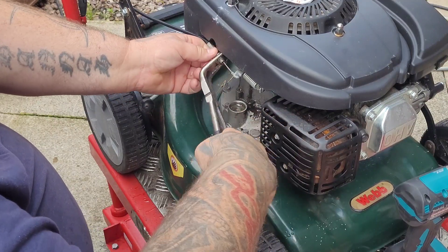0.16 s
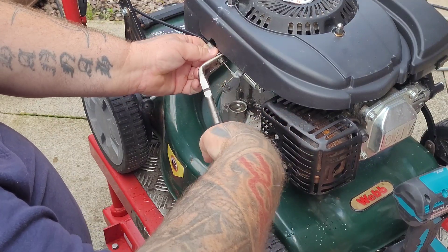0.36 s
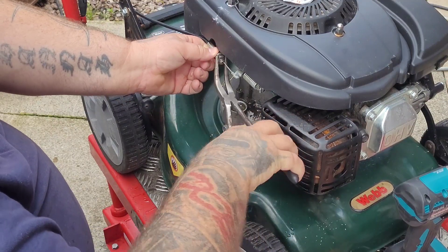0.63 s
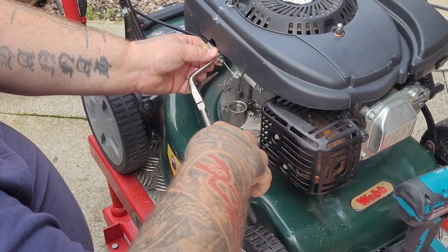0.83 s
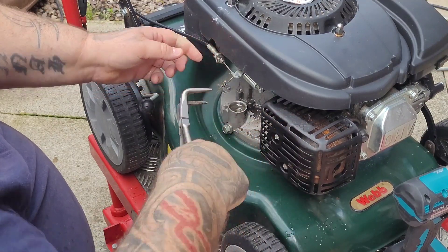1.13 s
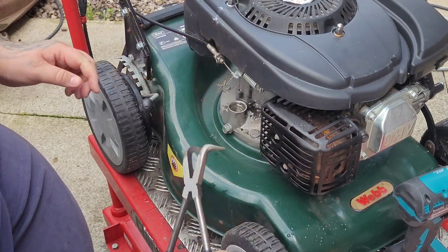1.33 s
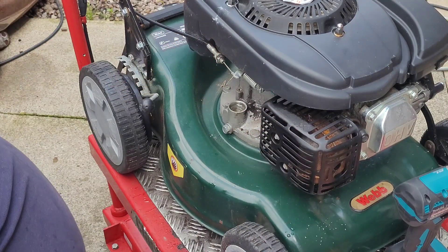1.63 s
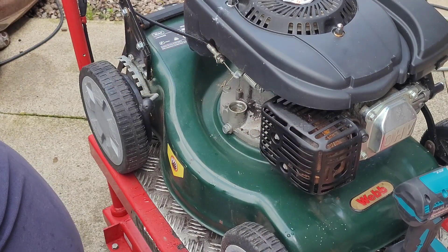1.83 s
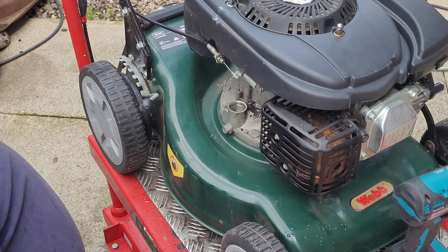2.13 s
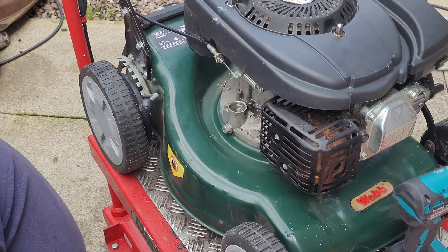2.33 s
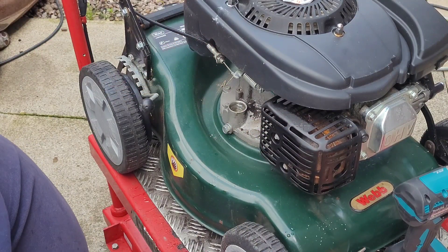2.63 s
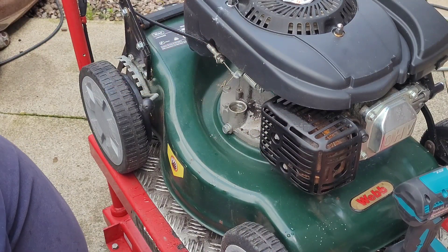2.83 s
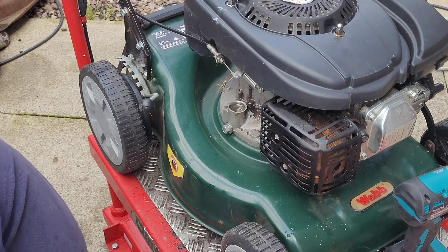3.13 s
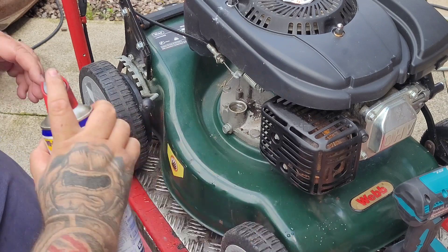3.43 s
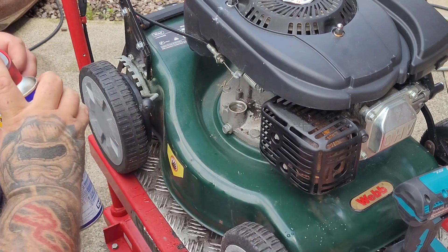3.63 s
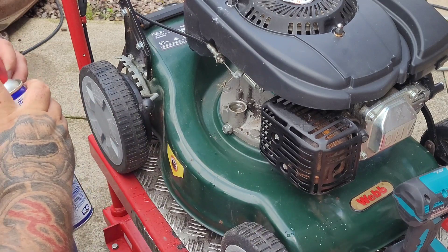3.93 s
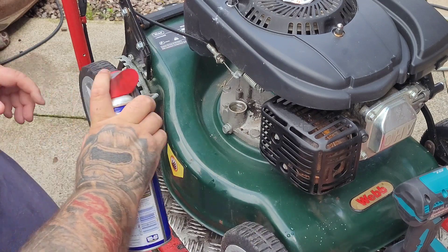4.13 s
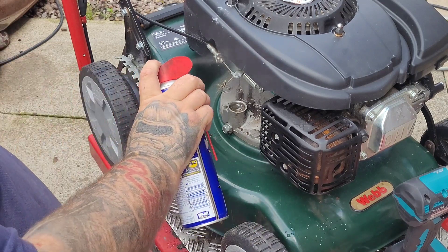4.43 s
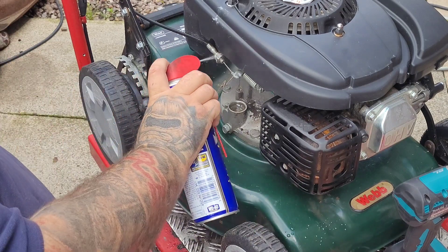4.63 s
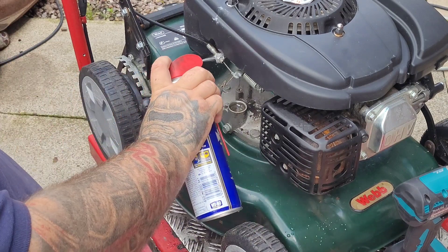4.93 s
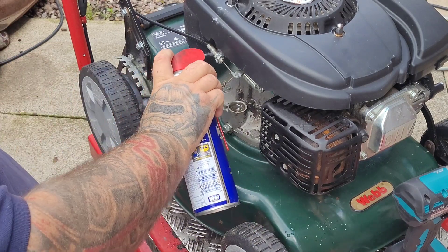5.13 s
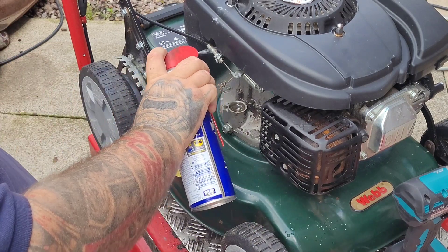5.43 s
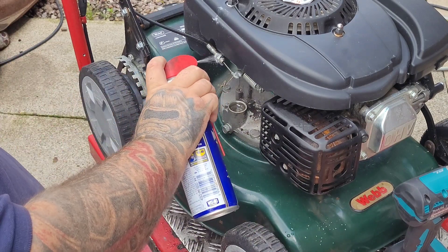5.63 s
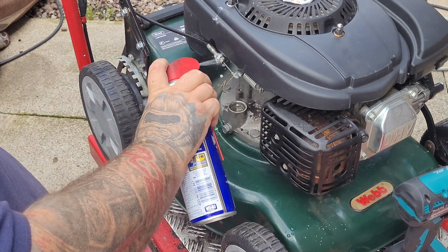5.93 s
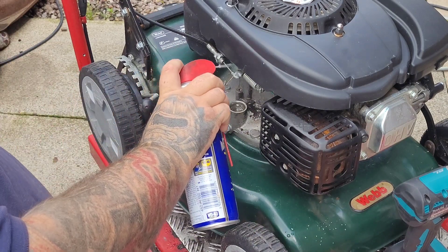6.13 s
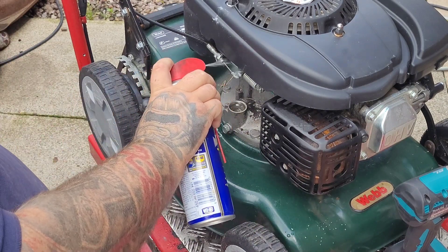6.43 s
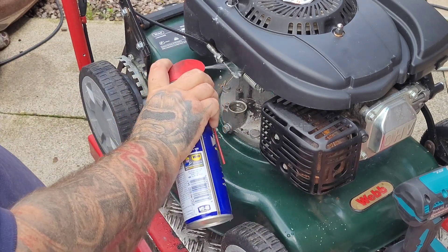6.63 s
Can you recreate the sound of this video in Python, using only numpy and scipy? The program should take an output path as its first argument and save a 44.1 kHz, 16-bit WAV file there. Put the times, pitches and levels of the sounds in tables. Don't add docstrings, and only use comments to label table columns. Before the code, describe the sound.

Close stereo pickup in a quiet paved yard with faint hum. Pliers touch and knock a metal mower deck, then drop onto a bench with loud, hollow booms and steel clangs, bouncing to a heavier final blow. Small plastic ticks and skin rubs follow as a can is handled. A brief burst of spray leads into a steady, sharp hiss that wets metal and continues to the end.

```python
import sys
import numpy as np
from scipy import signal
from scipy.fft import rfft, irfft, next_fast_len
from scipy.io import wavfile
from scipy.ndimage import uniform_filter1d, map_coordinates

SR = 44100
rng = np.random.default_rng(int(sys.argv[2]) if len(sys.argv) > 2 else 0)


def nominal_scale(level):
    x = np.asarray(level, float) / 20
    return 10 ** x


def waveform_to_disk(signal):
    frames = np.transpose(np.atleast_2d(signal))
    scaled = np.clip(frames, -1, 1) * 32767
    samples = np.round(scaled).astype(np.int16)
    wavfile.write(sys.argv[1], SR, samples)


N = 298557
LONG = next_fast_len(N, True)
TIME_S = np.arange(N) / SR
HZ = np.fft.rfftfreq(LONG, 1 / SR)
LOG_HZ = np.log(HZ + 1)
SIDES = np.array([[1.], [-1.]])
TOP_HZ = 15780

# opens [s], let go [s], rise [s], fall [s].
PRESSES = [
    (4.336, 4.529, 0.033, 0.05),
    (4.576, 7, 0.019, .05),
]
# time [s], flow as nozzle level [dB], aim at the metal [dB], reach into the hollow [dB].
JET_HAND = [(4.35, -48, 8, 3), (4.4, -46, 7, 2), (4.52, -43.5, 6, -1), (4.6, -49.5, 2, 1.5),
            (4.77, -47, -3.5, 1.5), (4.91, -49.5, -4.5, 3), (5.04, -49, 1, -2), (5.17, -44.5, -1, 2),
            (5.28, -47.5, 0, -0.5), (5.42, -46.5, 1, -1), (5.54, -45.5, -2.5, -2), (5.78, -49, 2.5, 3),
            (6.04, -44, 1, 4), (6.28, -44.5, -3, 1.5), (6.35, -45, 0.5, -1.5), (6.6, -47, -5, -0.5),
            (6.67, -48.5, 6, -3.5), (6.77, -45.5, 2.5, 0)]
# frequency [Hz], density [dB per Hz].
JET_SPECTRUM = [(530, -45), (900, -30.5), (1280, -27), (1770, -22.5), (2020, -23.5), (2690, -30),
                (3190, -23), (3770, -17.5), (4800, -12), (7860, -17), (8550, -20.5), (10600, -12.5),
                (11600, -12), (15100, -1), (16000, -1.5)]
# frequency [Hz], side minus mid [dB].
JET_SIDE = [(60, -6), (110, -11), (200, -8), (380, -6), (700, 5), (1290, -5.5), (2380, -7.5), (4400, -1.5),
            (8120, -2), (15000, -21.5)]
# echo delay [ms], drift [ms], gain [ratio].
NEARBY = [(.25, .06, .15), (.62, .1, .14), (.87, .08, -.13), (1.2, .06, .13), (1.9, .1, .08)]
# (time [s], peak [dB], low mode [Hz], upper mode [dB],
# upper mode [Hz]).
THUDS = [
    (0.22, [(0.104, -67, 290, -58, 648), (0.162, -60, 291, -54.5, 658)]),
    (0.16, [(0.565, -54, 340, -47, 682), (0.57, -51.5, 258, -34.5, 507), (0.805, -36.5, 250, -41, 665)]),
    (.06, [(0.8135, -29, 256.6, -36, 620)]),
    (.19, [(2.245, -27, 256, -33.5, 591), (2.255, -23.5, 307, -27, 385), (2.266, -20.5, 298, -21, 400.5)]),
    (.12, [(2.476, -23.5, 283, -24.5, 449), (2.509, -35, 226, -38.5, 452), (2.75, -21, 251, -15.5, 602.5), (2.775, -25.5, 225.5, -21, 574), (2.791, -31.5, 243, -26.5, 598)]),
    (.15, [(2.8585, -19.5, 218, -22.5, 340), (2.878, -6.5, 247, -21, 470), (2.8827, -9, 266, -27, 625), (3.261, -58, 231, -62, 390.4)]),
]
# (time [s], peak [dB], low mids [dB], treble [dB],
# left minus right [dB]).
CRACKS = [
    (0.08, [(0.5605, -43, -47, -51, -2.5), (.569, -49, -52, -60, -2)]),
    (0.033, [(0.7274, -78, -74, -74, -4), (0.8054, -54, -56, -71, -4.0), (0.8135, -41.5, -41, -52, -1)]),
    (.073, [(2.2441, -17.5, -20, -19.5, -1), (2.2483, -17.5, -30, -31.5, -3.5), (2.2609, -23, -27.5, -33.5, 1.5), (2.4782, -24.5, -41.5, -30.5, -2), (2.5121, -40, -50, -44, 2.5)]),
    (.099, [(2.751, -21, -24, -27, -2)]),
    (.076, [(2.8583, -18.5, -24, -27.5, -3.5), (2.8655, -23, -35, -35, -4), (2.878, -18, -24.5, -22.5, -1.5), (2.884, -22, -31, -32, -3)]),
]
# (frequency [Hz], peak [dB]).
CLANGS = [
    (.561, 0.11, -1, [(600, -43.5), (860, -46), (1420, -50), (1678, -47), (2070, -56), (2665, -49), (2560, -56), (4264, -60), (6240, -56)]),
    (.8135, 0.059, -2, [(1448, -41), (1950, -52), (2702, -57), (3000, -50.5), (4113, -52)]),
    (2.245, 0.1, -2, [(1138, -27), (1765, -21), (2050, -30), (3140, -29.5), (3350, -29), (3930, -29), (4354, -32), (4745, -32), (4930, -31), (5550, -32.5)]),
    (2.264, 0.13, -2, [(540, -25.5), (940, -31), (1240, -31), (1557, -33), (1925, -33), (2401, -31), (3680, -34.5)]),
    (2.479, 0.18, -2, [(560, -40), (1430, -47), (1985, -43), (2298, -41), (3390, -45), (3700, -43), (4238, -40.5), (4895, -46), (5900, -43)]),
    (2.751, .14, -0.5, [(350, -26), (1263, -21), (1625, -29), (1890, -32), (2070, -30), (2645, -34), (2850, -36), (3265, -36), (3575, -35.5), (4700, -36)]),
    (2.859, 0.098, -3, [(950, -32.5), (1310, -33.5), (1490, -32.5), (1855, -33.5), (2030, -31.5), (2945, -32), (4404, -32), (5780, -34)]),
    (2.879, 0.1, -2.5, [(850, -32), (1165, -31.5), (1420, -21), (1660, -28), (1855, -32.5), (2165, -33.5), (3705, -33.5), (3960, -28), (4165, -27), (4560, -32.5)]),
]
# time [s], peak [dB], frequency [Hz], t60 [s], left
# minus right [dB].
TICKS = [(3.294, -66, 1327, 0.037, -3.5), (3.3578, -60, 5470, 0.061, -9), (3.4428, -63, 6830, 0.048, 2.5),
         (3.552, -62, 3340, 0.047, 1.0), (3.5844, -60, 3420, 0.054, 0.5), (3.6994, -66, 2060, 0.045, -4),
         (3.7866, -59.5, 7570, 0.05, 5), (4.0206, -63.5, 6200, 0.05, 4.5), (4.2458, -67.5, 1826, 0.047, -2),
         (0.779, -58, 2480, 0.087, -6), (3.322, -64, 1357, 0.07, -2.5), (3.554, -70, 1893, 0.07, -2.0),
         (3.5844, -62, 1880, 0.07, -3), (3.6696, -72.5, 1183, 0.079, -4), (3.7, -66, 1180, .12, -2),
         (3.64, -70, 3300, .08, 0), (4.0, -64, 7300, .06, 2), (.11, -68, 1800, .06, -2),
         (3.6, -71, 2300, .07, -2), (.732, -58, 700, 0.066, 0), (.758, -64, 760, .09, 0),
         (3.293, -67.5, 2100, .06, -2), (3.326, -68, 2040, .06, -2), (3.36, -68, 1340, .09, -2),
         (3.362, -69, 2095, .05, -2), (3.358, -62, 7600, .05, 0), (3.58, -63, 5620, .05, 0),
         (4.4093, -54, 2165, 0.063, -9)]
# time [s], peak [dB], frequency [Hz], t60 [s], left minus right [dB].
SPITS = [
    (5.05, -52, 5260, .05, 4.5),
    (6.664, -41, 5120, 0.069, -3),
]
# time [s], level [dB], rise [s], fall [s] (over 20 dB), bright minus dull [dB].
RUBS = [(0.117, -74, 0.033, 0, -9), (0.4, -83, 0.17, 0.5, -19), (.735, -68, .012, .08, -10),
        (0.77, -62.5, 0.037, 0.07, -12.5), (1.015, -80, .07, 0.25, -6), (1.42, -88, 0.13, 2.5, -3),
        (2.35, -63.5, .05, 0.2, -14), (2.43, -69, .1, 0.17, -3), (2.53, -68, .03, 0.02, -5),
        (2.62, -70, .2, 0.3, -0.5), (2.73, -52, 0.059, 0.03, -11), (3.22, -101, .12, 0.5, 16),
        (3.285, -74, .03, -0.1, -10), (3.34, -79, .03, .06, -7), (3.365, -78, 0.069, 0.1, 6.5),
        (3.62, -83, .04, .07, -2), (3.67, -87, .1, 0.36, 6.5), (3.95, -87.5, 0.051, 0.2, 12.5),
        (4.244, -82.5, .012, 0.17, 2.5), (4.03, -79.5, 0.1, 0.23, 3.5)]
# time [s], level [dB], rise [s], fall [s] (over 20 dB),
# bright minus dull [dB].
FINGERS = [(0.795, -69, .04, .02, -5), (3.452, -95, 0.024, .04, 21), (3.557, -81, 0.019, 0.044, 6),
           (3.59, -84.5, 0.036, .05, 12), (3.796, -100, 0.051, .04, 18)]
# time [s], level [dB], rise [s], fall [s] (over 20 dB).
GRIP = [(4.74, -69, 0.3, 0.34), (4.42, -72, .08, .2), (5.73, -67, .03, 0.12), (6.07, -72, .1, .1)]
# time [s], level [dB], rise [s], fall [s] (over 20 dB).
DRAG = [(2.42, -70, .15, 0.5), (2.64, -70, .2, 0.4)]
# time [s], level [dB].
HUM_LEVEL = [(0.0, -70), (0.13, -67), (0.28, -69.5), (0.7, -64.5), (1.2, -72.5), (1.49, -68.5), (1.75, -70),
             (2.2, -70.5), (2.4, -65), (2.9, -62.5), (3.1, -71), (3.67, -72.5), (4.32, -69), (4.6, -63.5),
             (5.2, -69), (5.66, -66.5), (6.1, -62.5), (6.77, -65)]
# frequency [Hz], density [dB per Hz].
MURMUR_SPECTRUM = [(74, -30), (125, 0), (151, -16), (273, -11), (384, -16), (454, -21), (588, -25.5),
                   (710, -30.5), (779, -31), (1500, -38.5), (1950, -71.5), (3300, -120)]
# time [s], level [dB], time to fall 20 dB either way [s].
STAND_BUMPS = [(0.6, -69, 0.14), (0.84, -69, 0.08), (1.41, -53, 0.06), (1.63, -72, 0.2), (2.3, -53, 0.06),
               (2.57, -53, .1), (2.79, -57, 0.16), (2.9, -47, 0.13), (3.26, -64.5, 0.06), (3.98, -73, 0.34),
               (4.5, -69.5, 0.2), (4.75, -69.5, 0.13), (4.95, -68, 0), (5.17, -67.5, 0.2), (5.32, -70, 0.5),
               (5.62, -64.5, 0.2), (5.79, -49, .07), (5.96, -50.5, 0.1), (6.13, -59.5, 0), (6.22, -55.5, 0),
               (6.45, -60.5, 0.3), (6.77, -57, -0.07)]
# frequency [Hz], density [dB per Hz].
CAPSULE_SPECTRUM = [(1000, -3), (1500, 0), (2500, -5), (5000, -8), (7500, -8), (9500, -5), (11500, -8),
                    (15700, -8)]

VALVE_SHUT_DB = -27
SPLASH_DB = -16.5
HOLLOW_DB, HOLLOW_PER_FLOW, HOLLOW_PER_AIM, FLOW_MEAN_DB = -72, 1.86, 0.94, -47
FIRST_WIDE_DB = 9.5
BENCH_FROM_S, BENCH_TO_S = 2, 3
FRAME_T60_S, FRAME_PER_BLOW = .6, .45
BLOW_LAG_S = .00017
RUB_MIDDLE_DB, FINGER_MIDDLE_DB, MIDDLE_SHARE = -6, 3, 0.59
SWELL_POWER = 1.5
HUM_HZ, MURMUR_DB = 100, -6.5
STAND_DB, STAND_PER_GAIN, GAIN_MEAN_DB = -81, 1.1, -70
RUMBLE_DB, RUMBLE_PER_BLOW, RUMBLE_RISE_S, RUMBLE_FALL_S = -43, 0.47, .03, .14
CAPSULE_DB = -86
ROOM_T60_S, ROOM_DB = 0.19, -8


def unit(x):
    return x / np.sqrt(np.mean(x ** 2))


def colour(table):
    hz, db = np.transpose(table)
    return np.interp(LOG_HZ, np.log(hz), db)


def curves(rows):
    s, *columns = np.transpose(rows)
    return [np.interp(TIME_S, s, column) for column in columns]


def walk(rate_hz):
    hold = int(SR / rate_hz)
    levels = np.repeat(rng.standard_normal(N // hold + 1), hold)[:N]
    return unit(uniform_filter1d(levels, hold))


def swells(rows):
    power = np.zeros(N)
    for s, db, rise_s, fall_s in rows:
        span = slice(int(max(s - 4 * rise_s, 0) * SR), int((s + 4 * fall_s) * SR))
        lag_s = TIME_S[span] - s
        drop_db = 20 * np.maximum(-lag_s / rise_s, lag_s / fall_s) ** SWELL_POWER
        power[span] += nominal_scale(db - drop_db) ** 2
    return np.sqrt(power)


def hiss(lo_hz, hi_hz, shape_db, side_db, swell_db, flicker_db, rate_hz):
    bands = max(round(2 * np.log2(hi_hz / lo_hz)), 1)
    edges = np.log(np.geomspace(lo_hz, hi_hz, bands + 1))
    spectrum = rfft(rng.standard_normal((2, LONG)))
    spectrum *= nominal_scale(np.array([shape_db, shape_db + side_db])) * (HZ < TOP_HZ)
    spectrum *= np.clip(1 + 8 * np.minimum(LOG_HZ - edges[0], edges[-1] - LOG_HZ), 0, 1)
    out = 0
    for a, b in zip(edges, edges[1:]):
        offset = np.clip((LOG_HZ - (a + b) / 2) / (b - a), -1, 1)
        band = irfft(spectrum * np.cos(offset * np.pi / 2), LONG)[:, :N]
        out = out + band * nominal_scale(flicker_db * walk(rate_hz))
    out = out * nominal_scale(swell_db)
    mid, side = out / np.sqrt(np.mean(out[0] ** 2))
    return mid + SIDES * side


def ring(hz, gain, t60_s, phase, push_s):
    t = np.arange(int(min(.4, 1.3 * np.max(t60_s)) * SR))[:, None] / SR
    modes = gain * np.sin(2 * np.pi * hz * t + phase)
    fade = np.exp(-np.log(1000) * t / t60_s)
    return (modes * fade * (1 - np.exp(-t / push_s))).sum(axis=1)


def add(out, s, sound, pan_db):
    i = int(s * SR)
    out[:, i:i + sound.shape[-1]] += sound[..., :N - i] * nominal_scale(SIDES * pan_db / 2)


def valve():
    flow_db, aim_db, reach_db = curves(JET_HAND)
    gate = 0
    for opens_s, shuts_s, rise_s, fall_s in PRESSES:
        s = [opens_s, opens_s + rise_s / 2, opens_s + rise_s, shuts_s, shuts_s + fall_s]
        gate = gate + nominal_scale(np.interp(TIME_S, s, [VALVE_SHUT_DB, -3, 0, 0, VALVE_SHUT_DB], -150, -150))
    hollow_db = HOLLOW_DB + HOLLOW_PER_FLOW * (flow_db - FLOW_MEAN_DB) + HOLLOW_PER_AIM * aim_db + reach_db
    nozzle = gate * nominal_scale(flow_db)
    splash = gate ** 0.58 * nominal_scale(flow_db + SPLASH_DB + aim_db)
    return nozzle, splash, gate ** .55 * nominal_scale(hollow_db)


def near_echoes(jet):
    start = int(PRESSES[0][0] * SR)
    here, out = np.arange(N - start), jet.copy()
    for delay_ms, drift_ms, gain in NEARBY:
        lag = (delay_ms + drift_ms * walk(2.5)[start:]) * SR / 1000
        out[:, start:] += [gain * map_coordinates(port[start:], [here - lag], order=3) for port in jet]
    return out / np.sqrt(1 + sum(row[2] ** 2 for row in NEARBY))


def spray():
    nozzle, splash, hollow = valve()
    shape, side = colour(JET_SPECTRUM), colour(JET_SIDE)
    sputter = 0.72 * walk(120.) + 0.39 * walk(45.)
    gas = nozzle * hiss(7530.0, 16030.0, shape, side, sputter, 0.28, 11.0) * nominal_scale(-.4 * SIDES)
    first = TIME_S < PRESSES[1][0]
    scatter = SIDES * (gas[0] - gas[1]) / 2 * (nominal_scale(FIRST_WIDE_DB) - 1) * first
    drops = splash * nominal_scale(-1.2 * SIDES) * hiss(4080.0, 8970.0, shape, side, 0.95 * sputter, 1.0, 9.7)
    housing = hollow * nominal_scale(-.8 * SIDES) * hiss(796.0, 4195.0, shape, side, .5 * sputter, 1.6, 16.0)
    return near_echoes(gas + scatter + drops + housing)


def thuds():
    out = np.zeros((2, N))
    spread = np.arange(6) > 0
    for t60_s, s, low_db, low_hz, up_db, up_hz in [(t60_s, *r) for t60_s, rows in THUDS for r in rows]:
        near, size = rng.standard_normal((2, 2, 6))
        hz = np.array([[low_hz], [up_hz]]) * np.exp(np.array([[.2], [.3]]) * near * spread)
        db = np.array([[low_db], [up_db + 0.5]]) - spread * (np.array([[15], [8]]) + 2.1 * size)
        lasting_s = t60_s * np.array([[1.01], [.55]]) * (1 - 0.061 * spread)
        if BENCH_FROM_S < s < BENCH_TO_S:
            frame_db = FRAME_PER_BLOW * low_db + np.array([-30.5, -36.5])
            frame = ring(np.array([283, 403]), nominal_scale(frame_db), FRAME_T60_S, 0, .01)
        else:
            frame = ring(hz[:, 0] * 1.1, nominal_scale(db[:, 0] - 20), 2.1 * t60_s, 0, 0.011)
        add(out, s, frame * np.hanning(2 * len(frame))[len(frame):], 0)
        add(out, s, ring(hz.ravel(), nominal_scale(db.ravel()), lasting_s.ravel(), 0, 0.0014), 0)
    return signal.sosfilt(signal.butter(2, 100, "high", fs=SR, output="sos"), out)


def cracks():
    out, t = np.zeros((2, N)), np.arange(16384) / SR
    octaves = np.log2(np.fft.rfftfreq(len(t), 1 / SR) + 1)
    band_hz = np.log([700, 1300, 3500, 9500, 15500])
    for t60_s, s, db, mids_db, treble_db, pan_db in [(t60_s, *r) for t60_s, rows in CRACKS for r in rows]:
        noise = rfft(rng.standard_normal((2, len(t)))) * (octaves < np.log2(TOP_HZ))
        rattle = nominal_scale(2.0 * np.repeat(rng.standard_normal(len(t) // 64), 64))
        levels_db = [mids_db - 10, mids_db - 5, db - 11.5, treble_db - 7.0, treble_db - 11.5]
        sound = 0
        for hz in 700 * 2 ** np.arange(0, 4.6, .5):
            band_db = np.interp(np.log(hz), band_hz, levels_db)
            mask = np.cos(np.clip(2 * (octaves - np.log2(hz)), -1, 1) * np.pi / 2)
            fade = nominal_scale(-60 * t / (t60_s * (hz / 3000) ** -.2)) + 0.5 * np.exp(-t / 0.0017)
            width = [[1], [min(hz / 3000, 1)]]
            sound = sound + nominal_scale(band_db) * unit(irfft(noise * mask)) * fade * width
        mid, side = sound * rattle * (1 - np.exp(-t / 0.00045))
        add(out, s, mid * nominal_scale(1.0) + 0.9 * SIDES * side, pan_db)
        place, size, phase = rng.random((3, 14))
        partial_db = mids_db + place * (db - mids_db) - 18 - 8 * size
        partials = ring(900 * 5.5 ** place, nominal_scale(partial_db), 1.6 * t60_s, 2 * np.pi * phase, 0.00062)
        add(out, s, partials, pan_db)
    return out


def clangs():
    out = np.zeros((2, N))
    for s, t60_s, pan_db, partials in CLANGS:
        hz, db = np.transpose(partials)
        phase = 2 * np.pi * rng.random(len(hz))
        add(out, s, ring(hz, nominal_scale(db), t60_s * (hz / 2000) ** -.1, phase, 0.00082), pan_db)
    return out


def ticks():
    out = np.zeros((2, N))
    for s, db, hz, t60_s, pan_db in TICKS + SPITS:
        spread, phase = rng.standard_normal((2, 40))
        mode_hz = hz * np.exp(0.079 * spread * (hz / 4000) ** 0.94)
        mode_db = db - 15.0 - 2.6 * spread ** 2
        add(out, s, ring(mode_hz, nominal_scale(mode_db), t60_s, 3 * phase, 0.0015), pan_db)
    return out


def strokes():
    rows = [(*r, RUB_MIDDLE_DB) for r in RUBS] + [(*r, FINGER_MIDDLE_DB) for r in FINGERS]
    return [swells([(s, db + share * tilt_db + on * middle_db, rise_s, fall_s)
                    for s, db, rise_s, fall_s, tilt_db, middle_db in rows])
            for share, on in [(0, 0), (MIDDLE_SHARE, 1), (1, 0)]]


def rubs():
    dull, middle, bright = strokes()
    flat, grain = np.zeros(len(HZ)), 1.5 * walk(200.)
    dull_shape, grip_shape = -4 * np.log2(HZ / 500 + 1), -12 * np.log2(HZ / 400 + 1)
    return (dull * hiss(454.6, 2320.0, dull_shape, -3.0, grain, 1.5, 23.0)
            + middle * hiss(2200., 5978.0, flat, -1.0, grain, 0.44, 33.0)
            + bright * hiss(5800.0, 15806.0, flat, -1.5, grain, 1.7, 25.0)
            + swells(GRIP) * hiss(230.0, 1420.0, grip_shape, -2.5, grain, 1.8, 17.0))


def drag():
    return swells(DRAG) * hiss(12000., 14000., np.zeros(len(HZ)), -3.0, 1.5 * walk(90.), 1.0, 25.)


def backdrop():
    gain_db = curves(HUM_LEVEL)[0]
    rumble = swells([(r[0] + RUMBLE_RISE_S, RUMBLE_DB + RUMBLE_PER_BLOW * r[1], RUMBLE_RISE_S, RUMBLE_FALL_S)
                     for _, rows in THUDS for r in rows])
    tremor = nominal_scale(STAND_DB + STAND_PER_GAIN * (gain_db - GAIN_MEAN_DB))
    bumps = swells([(s, db, width_s, width_s) for s, db, width_s in STAND_BUMPS])
    return nominal_scale(gain_db), np.hypot(nominal_scale(gain_db + MURMUR_DB), rumble), np.hypot(tremor, bumps)


def yard():
    hum, murmur, shake = backdrop()
    line = np.sqrt(2) * np.sin(2 * np.pi * HUM_HZ * TIME_S + 0.17 * walk(6.3)) * nominal_scale(.6 * walk(4.9))
    side = colour([(100, -9.5), (300, -9.0), (700, 0.5), (1300, 2.2)])
    air = nominal_scale(2.0) * hiss(125., 1500., colour(MURMUR_SPECTRUM), side, .8 * walk(3.7), .8, 4.0)
    stand = hiss(41.0, 82., -9 * np.log2(HZ / 50 + 1e-3) ** 2, -2.5, 0, 1.5, 12.)
    envelope = np.abs(signal.hilbert(stand, LONG)[:, :N]).mean(axis=0)
    stand = stand / (.7 * envelope + .08) ** .85
    capsule = nominal_scale(CAPSULE_DB) * hiss(1000.0, 20000.0, colour(CAPSULE_SPECTRUM), .3, 0, 0.3, 14.0)
    return hum * line + murmur * air + shake * stand + capsule


def shed(x):
    t = np.arange(int(.4 * SR)) / SR
    fade = (nominal_scale(-60 * t / ROOM_T60_S) + nominal_scale(-26 - 60 * t / 0.49)) * (1 - np.exp(-t / 0.0023))
    mid, side = rng.standard_normal((2, len(t))) * fade
    side = signal.sosfilt(signal.butter(1, 1300, "high", fs=SR, output="sos"), side)
    no_bass = signal.butter(2, 380, "high", fs=SR, output="sos")
    tail = signal.lfilter([1], [1, -.35], signal.sosfilt(no_bass, mid + 1.1 * SIDES * side))
    tail = tail / np.sqrt(np.sum(tail ** 2, axis=1, keepdims=True))
    return signal.fftconvolve(x, tail, axes=1)[:, :N]


def scene():
    jet, blows, small = spray(), thuds() + cracks() + clangs(), ticks()
    near = blows + nominal_scale(ROOM_DB) * shed(blows)
    near[0] = np.roll(near[0], round(BLOW_LAG_S * SR))
    walls = nominal_scale(ROOM_DB) * shed(small + nominal_scale(-5.5) * jet)
    return jet + near + small + walls + rubs() + drag() + yard()


def roll_off(x):
    return signal.sosfilt(signal.butter(12, 16990, fs=SR, output="sos"), x)


def record(dry):
    low_pass = signal.ellip(6, .3, 60, 15950, fs=SR, output="sos")
    return roll_off(signal.sosfilt(low_pass, np.tanh(dry)))


dry = scene()
out = record(dry)
waveform_to_disk(out)
```